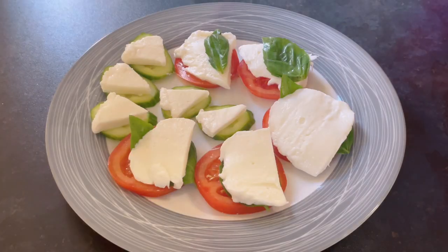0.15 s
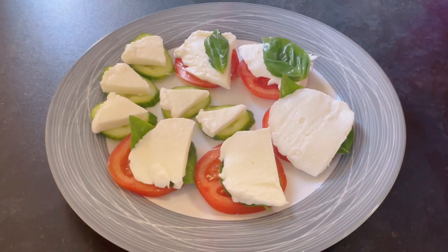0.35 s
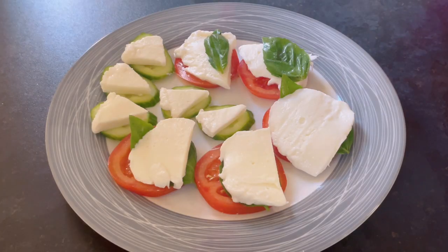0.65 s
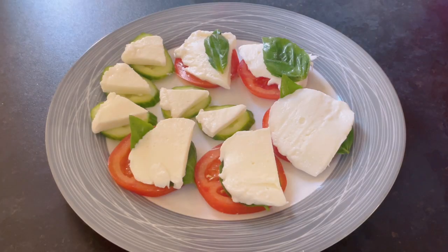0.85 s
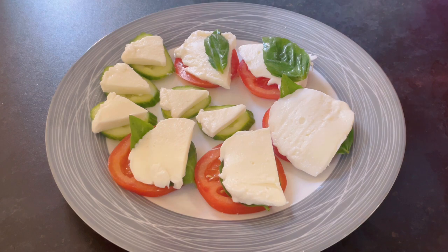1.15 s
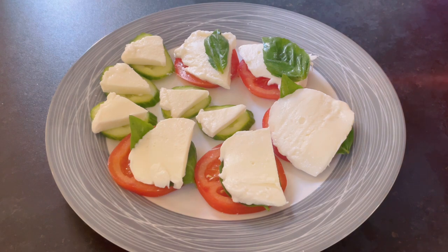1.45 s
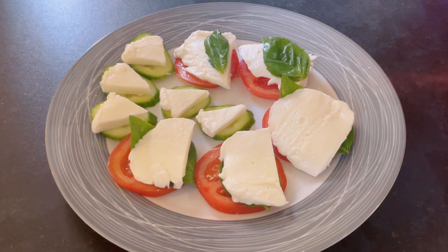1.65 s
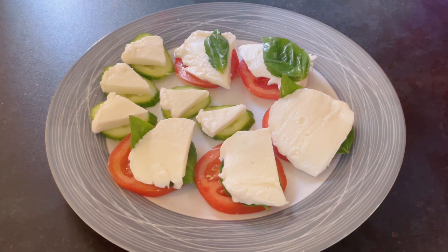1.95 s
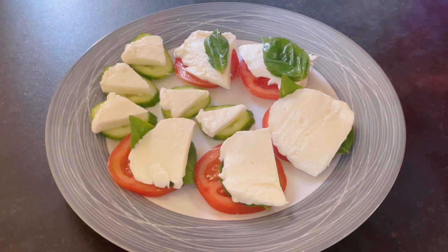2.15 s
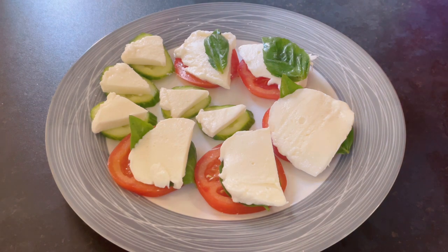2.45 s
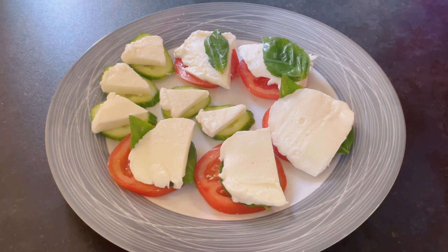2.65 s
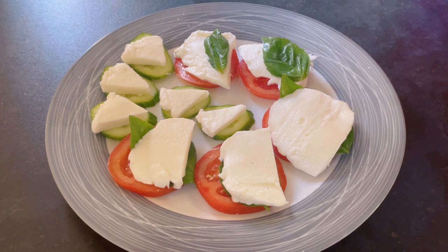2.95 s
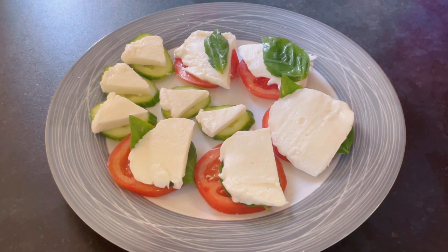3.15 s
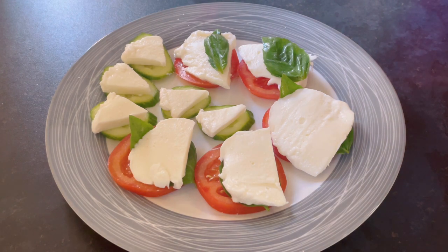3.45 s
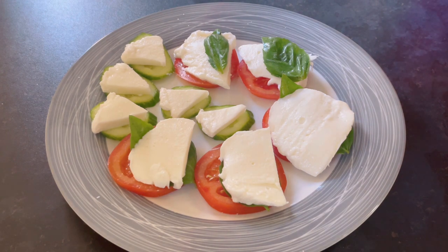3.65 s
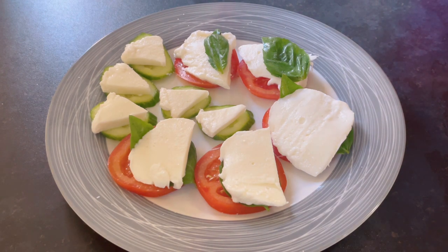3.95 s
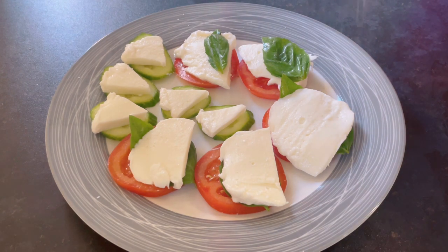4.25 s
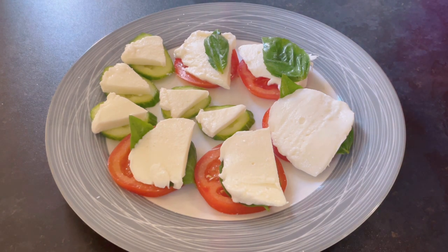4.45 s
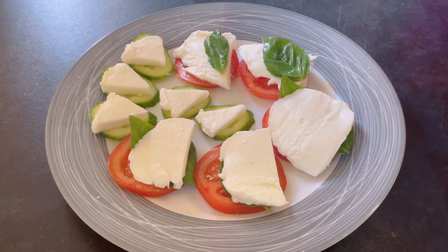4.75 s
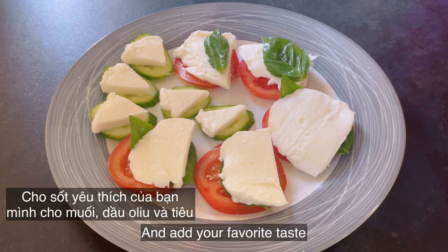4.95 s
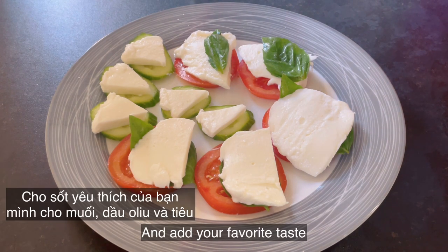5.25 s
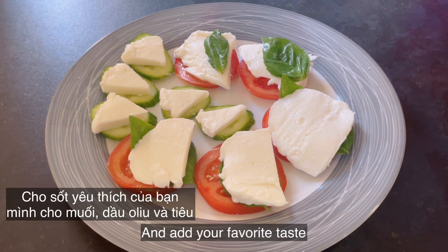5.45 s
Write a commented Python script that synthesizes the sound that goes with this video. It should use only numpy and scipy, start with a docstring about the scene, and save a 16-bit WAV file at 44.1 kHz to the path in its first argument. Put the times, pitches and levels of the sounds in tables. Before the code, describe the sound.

Close to the microphone in a small hard kitchen, a hand-turned spice mill grinds in short crunchy strokes from the very start. Sharp bright grain cracks ride over fine grit, with soft low thuds in the body. Between strokes loose grains patter, the mechanism ticks and a palm scuffs briefly. Strokes continue unevenly until the end, over faint rumble and hiss.

```python
"""In a small hard kitchen a hand-turned spice mill grinds in short strokes, close to one microphone.
From the start grains crack over finer grit, and the body thuds and is knocked. After the second stroke
loose grains settle, the mechanism ticks, a metal part rings faintly and the palm scuffs the body.
Strokes, ticks and scuffs then alternate to the end, over rumble and hiss. Noise bursts make the grains, shaped
noise the body and room, decaying sines the metal and the swing; a phase filter widens it to two channels."""
import sys
import numpy as np
from scipy import signal
from scipy.fft import rfft, irfft, next_fast_len
from scipy.io import wavfile
from scipy.ndimage import uniform_filter1d

SR = 44100
rng = np.random.default_rng(int(sys.argv[2]) if len(sys.argv) > 2 else 0)


def wav_out(sig):
    """Save sig, one row per channel (or a flat mono array), as 16-bit PCM at SR to the path in sys.argv[1]."""
    wavfile.write(sys.argv[1], SR, np.round(np.clip(np.atleast_2d(sig).T, -1, 1) * 32767).astype(np.int16))


def amplitude_ratio(level_db):
    """Convert a level in decibels to the matching linear amplitude (field) ratio."""
    exponent = np.asarray(level_db, float) / 20
    return 10 ** exponent


N = 246959


def rms_one(x):
    """Scaled to rms 1."""
    return x / np.sqrt(np.mean(x ** 2) + 1e-20)


def at_hz(points, hz):
    """A table read on a log-frequency axis."""
    hz_points, values = np.transpose(points)
    return np.interp(np.log(hz + 1), np.log(hz_points + 1), values)


def colour(x, spectrum):
    """Causal (minimum-phase) colouring with unit power gain on white noise."""
    size = 16384
    gain = rms_one(amplitude_ratio(at_hz(spectrum, np.fft.rfftfreq(size, 1 / SR))))
    cepstrum = irfft(np.log(gain))
    # folding the cepstrum forward in time gives minimum phase
    cepstrum[1:size // 2] *= 2
    cepstrum[size // 2 + 1:] = 0
    response = irfft(np.exp(rfft(cepstrum)))
    return signal.fftconvolve(x, response)[:len(x)]


def band(x, low_hz, high_hz):
    """Band-pass."""
    return signal.sosfilt(signal.butter(2, [low_hz, high_hz], "band", fs=SR, output="sos"), x)


def place(times, shapes):
    """Lays one short shape at each time."""
    out = np.zeros(N + shapes.shape[1])
    for s, shape in zip(times, shapes):
        at = max(round(s * SR), 0)
        out[at:at + len(shape)] += shape
    return out[:N]


def plateau(spans, in_db_per_s, out_db_per_s):
    """Level in dB over time: each span ramps in before its start, holds, and ramps out after its end."""
    start, end, level_db = np.transpose(spans)[:, :, None]
    t = np.arange(0, N, 32) / SR
    ramp_in = in_db_per_s * np.maximum(start - t, 0)
    ramp_out = out_db_per_s * np.maximum(t - end, 0)
    each = level_db - ramp_in - ramp_out
    return np.interp(np.arange(N) / SR, t, each.max(axis=0))


# Rumble of the grip and the room, over time: start_s, level_db
HANDLING = [(0, -66), (.39, -78.5), (1.09, -73), (1.249, -82), (1.85, -78.5), (1.999, -74.5), (3.15, -71.5),
            (3.37, -74), (4.16, -72), (5.41, -74), (5.6, -67)]
# Spectrum of that rumble, relative density: pitch_hz, level_db (per Hz)
RUMBLE = [(25, -22), (45, 2), (85, 0.5), (200, -5.5), (450, -7.5), (600, -18.5), (1000, -23.5), (3000, -58)]
# Spectrum of the room hiss, relative density: pitch_hz, level_db (per Hz)
AIR = [(300, -18.5), (1000, -15.5), (3000, -18), (7000, -4.5), (12000, -5.5), (14500, -6.5), (16000, -28)]
AIR_DB = -77.5  # rms level of the hiss


def air():
    """Low rumble that follows the grip, over a faint steady hiss."""
    # the first second is cut off, so that the colouring has settled
    rumble = rms_one(colour(rng.standard_normal(N + SR), RUMBLE)[SR:])
    hiss = rms_one(colour(rng.standard_normal(N + SR), AIR)[SR:])
    grip_db = np.interp(np.arange(N) / SR, *np.transpose(HANDLING))
    return amplitude_ratio(grip_db) * rumble + amplitude_ratio(AIR_DB) * hiss


# How long the small hard kitchen rings: pitch_hz, t60_s
KITCHEN_T60 = [(300, 0.78), (800, 0.26), (2100, 0.5), (5500, 0.39), (14000, 0.23)]


def kitchen(x, first_s=0.00081):
    """Dense reflections: noise dying band by band, after a short gap."""
    t, echo = np.arange(SR // 2) / SR, 0
    for hz in 125 * 2 ** np.arange(0, 7.1, .5):  # half-octave bands
        noise = band(rng.standard_normal(len(t)), hz / 2 ** .25, hz * 2 ** .25)
        echo = echo + noise * amplitude_ratio(-60 * t / at_hz(KITCHEN_T60, hz))
    echo = echo * np.clip(t / first_s - 1, 0, 1)
    unit_energy = echo / np.sqrt(np.sum(echo ** 2))
    return signal.fftconvolve(x, unit_energy)[:N]


# Palm sliding on the body: start_s, end_s, level_db, low_edge_hz, high_edge_hz
SCUFF = [(.69, 0.73, -75, 750, 960), (1.135, 1.168, -63, 247, 1014), (1.72, 1.748, -76.5, 764, 1110),
         (4.686, 4.738, -69, 657, 1030)]
SCUFF_IN_DB_PER_S, SCUFF_OUT_DB_PER_S = 1501, 304.5


def scuff():
    """Skin friction: a short dull hiss."""
    out = 0
    for start, end, level_db, low_hz, high_hz in SCUFF:
        slide_db = plateau([(start, end, level_db)], SCUFF_IN_DB_PER_S, SCUFF_OUT_DB_PER_S)
        out = out + amplitude_ratio(slide_db) * rms_one(band(rng.standard_normal(N), low_hz, high_hz))
    return out


# Hand knocks, the whole mill swings: start_s, level_db (before its soft rise)
SWINGS = [(1.161, -49.5), (3.005, -60), (4.1, -52.5), (4.206, -59.5), (4.556, -57), (5.552, -64)]
DEEP_HZ, DEEP_T60_S = 85, 0.21


def swings(rise_s=0.0043):
    """One deep decaying sine per hand knock: the whole mill swings."""
    s, level_db = np.transpose(SWINGS)[:, :, None]
    t = np.arange(16384) / SR
    swell = 1 - np.exp(-t / rise_s)
    swing = np.sin(2 * np.pi * DEEP_HZ * t) * swell * amplitude_ratio(level_db - 60 * t / DEEP_T60_S)
    return place(s[:, 0], swing)


# Jolts in the body as the burrs bite: start_s, level_db (before the soft rise)
THUDS = [(.157, -49.5), (.294, -48.5), (0.58, -61), (0.815, -62), (.952, -48.5), (1.162, -57), (1.442, -57),
         (1.746, -72), (2.047, -50.5), (2.523, -56.5), (2.675, -48), (3.004, -59.5), (3.183, -43.5),
         (3.603, -53), (3.68, -57), (3.76, -51.5), (4.1, -47), (4.205, -64), (4.556, -58), (5.1, -48.5),
         (5.382, -53), (5.552, -58)]
THUD_T60_S = 0.11


def thuds(rise_s=0.0046, edge_hz=320):
    """Soft low pushes: dull noise that swells and dies."""
    s, level_db = np.transpose(THUDS)[:, :, None]
    t = np.arange(16384) / SR
    dull = rms_one(band(rng.standard_normal((len(s), len(t))), 39.0, edge_hz))
    pushes = dull * (1 - np.exp(-t / rise_s)) * amplitude_ratio(level_db - 60 * t / THUD_T60_S)
    return place(s[:, 0], pushes)


# A hard grain giving way knocks the body: start_s, peak_db
KNOCKS = [(.2983, -42.5), (.9515, -53.5), (2.6825, -51.5), (3.1884, -43.5), (3.7655, -61), (4.1075, -53),
          (4.5529, -49), (5.1043, -45), (5.4926, -62), (5.557, -41)]
KNOCK_T60_S, KNOCK_LOW_HZ, KNOCK_HIGH_HZ = 0.02, 123, 820


def knocks():
    """Short hollow knocks: a noise burst in the body's low range."""
    s, peak_db = np.transpose(KNOCKS)[:, :, None]
    t = np.arange(4096) / SR
    dying = rng.standard_normal((len(s), len(t))) * amplitude_ratio(-60 * t / KNOCK_T60_S)
    burst = band(dying, KNOCK_LOW_HZ, KNOCK_HIGH_HZ)
    peak_one = burst / np.abs(burst).max(axis=1, keepdims=True)
    return place(s[:, 0], peak_one * amplitude_ratio(peak_db))


def strike(events, modes, soft_s, level_db):
    """Each touch rings every mode with a strength and a slight delay of its own, swelling in softly."""
    s, event_db = np.transpose(events)
    t, out = np.arange(1024) / SR, 0
    for hz, mode_db, t60 in modes:
        late, uneven = rng.random((len(s), 2)).T
        push = np.sin(2 * np.pi * hz * t) * np.exp(-t / soft_s) * 2 / (soft_s * SR)
        gain = amplitude_ratio(event_db + mode_db + level_db - 1.7 * uneven)
        force = place(s + soft_s * late, push * gain[:, None])
        # two-pole resonator: r is its decay per sample, w its pitch in radians per sample
        r, w = amplitude_ratio(-60 / (t60 * SR)), 2 * np.pi * hz / SR
        out = out + signal.lfilter([0, np.sin(w)], [1, -2 * r * np.cos(w), r * r], force + 1e-18)
    return out


# Play taken up on turning back: start_s, level_db
TICKS = [(0.6593, -41.5), (1.9046, -43), (2.9137, -39), (2.9393, -42.5), (4.91, -34.5)]
# What the mechanism adds to a tick: pitch_hz, level_db (over the tick, before the lift in metal), t60_s
TICK_MODES = [(6370, -20, .015), (13600, -22, 0.031)]
# Metal part brushed: start_s, level_db (before the mode level and the cut in metal)
RINGS = [(0.6905, -44), (1.7652, -50)]
# Modes of that part: pitch_hz, level_db (relative), t60_s
RING_MODES = [(2800, -3, .05), (3680, -5, .04), (4630, 0, .05), (5650, -3, .05), (8020, -2, .04),
              (9600, -6, .04), (10770, -4, 0.036), (12370, -1, .06), (14000, -3, .06)]


def metal():
    """Decaying resonances of the ticking mechanism and of the brushed metal part."""
    mechanism = strike(TICKS, TICK_MODES, soft_s=.0004, level_db=13.0)
    brushed = strike(RINGS, RING_MODES, soft_s=.005, level_db=-10.0)
    return mechanism + brushed


def ticks():
    """Rows for snaps: the dry tick of the mechanism on turning back."""
    low_db, high_db, ring_hz, ring_db = -9, -7, 6500, 4
    return [row + (low_db, high_db, ring_hz, ring_db) for row in TICKS]


def scattered(spans, per_s, over_db, spread_db, low_db, high_db, colour_db, ring_hz, ring_db):
    """Random failures inside the spans, as rows for snaps; ring_hz is a range."""
    rows = []
    for start, end, level_db in spans:
        even, normal = rng.random((40, 2)), rng.standard_normal((40, 3))
        s = start + np.cumsum(.2 + 2.4 * even[:, 0] ** 2) / per_s  # uneven gaps, per_s on average
        hz = ring_hz[0] * (ring_hz[1] / ring_hz[0]) ** even[:, 1]
        centre = [level_db + over_db, low_db, high_db]
        level, low, high = (centre + normal * [spread_db, colour_db, colour_db]).T
        drawn = zip(s, level, low, high, hz, np.full(40, ring_db))
        rows += [row for row in drawn if row[0] < end]
    return rows


# Loose grains settling as the mill tilts back: start_s, end_s, level_db
SETTLING = [(0.439, 0.647, -53), (1.17, 1.24, -50.5), (1.251, 1.311, -54)]


def settling():
    """Rows for snaps: a quick random patter of loose grains."""
    return scattered(SETTLING, per_s=170, over_db=0, spread_db=3, low_db=-25, high_db=-5,
                     colour_db=2.2, ring_hz=(4508, 3910), ring_db=16)


# Turns of the wrist: start_s, end_s, level_db (pressure on the burrs, as level of the fine grit)
STROKES = [(0, .07, -43), (.15, .36, -52), (.79, .84, -70), (.94, 1.09, -50), (1.43, 1.62, -52.5),
           (2.025, 2.14, -48.5), (2.48, 2.61, -58), (2.68, 2.72, -70), (3.08, 3.31, -52),
           (3.52, 3.62, -53.5), (3.66, 3.8, -60), (3.84, 4.02, -78), (4.06, 4.24, -59), (4.31, 4.46, -74),
           (4.55, 4.61, -55), (5.06, 5.22, -58), (5.38, 5.41, -47.5), (5.45, 5.6, -58)]
# What the mill radiates, relative density: pitch_hz, level_db (per Hz)
MILL = [(200, -33), (650, -34), (1100, -20), (1600, -19.5), (2400, -16), (3400, -16), (4200, -18),
        (5100, -9.5), (6500, -8), (8000, 0), (9400, 2), (11500, 4.5), (12600, 3), (14500, -6.5),
        (15800, -19.5), (16500, -41)]
BITE_DB_PER_S, EASE_DB_PER_S = 4000, 299.5  # pressure builds fast and eases off slower
SIFT_REL_DB = -12  # dust under the settling grains


def grit(per_s=2500, spread_db=3):
    """Dense small fractures of uneven size under the pressure of the stroke; dust sifts as grains settle."""
    broken = rng.random(N) < per_s / SR
    sizes = amplitude_ratio(spread_db * np.minimum(rng.exponential(1, N), 5)) * broken
    lasting = np.sqrt(signal.lfilter([1], [1, -.93], sizes ** 2))  # each dies over some samples
    sifting = [(start, end, level_db + SIFT_REL_DB) for start, end, level_db in SETTLING]
    pressure_db = plateau(STROKES + sifting, BITE_DB_PER_S, EASE_DB_PER_S)
    return amplitude_ratio(pressure_db) * rms_one(colour(lasting * rng.standard_normal(N), MILL))


def chips():
    """Rows for snaps: small grains chipping at random during a stroke."""
    return scattered(STROKES, per_s=70.0, over_db=14.5, spread_db=3.5, low_db=-20, high_db=-6,
                     colour_db=4, ring_hz=(2000, 14000), ring_db=9.5)


# Single grains cracking: start_s, level_db,
# low_db (part under 3 kHz, relative), high_db (part over 10 kHz, relative), pitch_hz (of the ring)
CRACKS = [(0.014, -24, -17, -5.5, 6260), (0.0365, -27, -25, -6, 6200), (0.0693, -22, -16.5, -1, 11200),
          (0.153, -16.5, -22.5, -5, 3420), (0.164, -18.5, -22, -1, 10000), (.1779, -17.5, -22, -2.5, 10200),
          (0.1886, -16, -24.5, -5.5, 6000), (0.2063, -26.5, -11.5, -18.5, 6000),
          (.2183, -27, -42, -12.5, 7000), (0.2395, -40, -10, -5.5, 9600), (0.255, -35.5, -14, -3.5, 6500),
          (.29, -30.5, -29.5, -14.5, 5740), (0.2992, -10.5, -19.5, -2, 9700), (0.3163, -31, -28, -29, 4930),
          (0.3292, -26, -12.5, -31, 3800), (0.3432, -23, -21, -2, 5800), (0.3543, -29, -13.5, -17, 4830),
          (.794, -23, -22, -6, 5920), (.798, -35, -15.5, -20, 5400), (0.8181, -24.5, -17, -4, 5600),
          (0.824, -28, -23, -12, 3190), (.832, -29.5, -20, -1.5, 7460), (0.9406, -17, -17.5, -1.5, 5700),
          (0.9508, -14.5, -22.5, -3, 6300), (0.9609, -16.5, -21, -11.5, 4900),
          (0.9757, -16, -18, -3.5, 9350), (1.0038, -26.5, -22, -26, 7300), (1.02, -28, -24, -4, 11670),
          (1.0381, -29.5, -16, -25.5, 9500), (1.056, -27, -24, -3, 12700), (1.061, -24.5, -24, -10, 9300),
          (1.0858, -43, -14, -18, 8530), (1.076, -33, -19, -9.5, 5840), (1.1596, -41, -19, 2, 10700),
          (1.2459, -48, -29.5, 1, 5080), (1.2542, -45.5, -12, -12.5, 4480), (1.431, -39, -22, -1, 11400),
          (1.4382, -29.5, -24.5, -18, 6460), (1.4426, -25.5, -19, -1.5, 13200),
          (1.448, -22, -16.5, -21, 6200), (1.456, -27.5, -16, 0, 9200), (1.4796, -35.5, -14, -8.5, 6240),
          (1.4997, -20, -27, -1.5, 9700), (1.55, -29.5, -14.5, -19, 3250), (1.554, -32, -20, -4, 12800),
          (1.6093, -21, -19.5, -2.5, 13000), (1.8594, -62.5, -7, -3.5, 12270), (1.976, -74, 12, -13, 1650),
          (2.0265, -21.5, -13, 2.5, 6300), (2.0385, -22.5, -20, -19, 8600),
          (2.0426, -29.5, -6, -11.5, 10100), (2.0543, -21, -13, -17, 8700), (2.066, -23, -14.5, -8, 6200),
          (2.0789, -20, -17, -2, 11400), (2.0936, -27, -13, -9.5, 5900), (2.0998, -42, -7, -16.5, 8600),
          (2.129, -21.5, -18, -3, 9700), (2.137, -22, -22.5, -2.5, 4000), (2.279, -52.5, -20.5, -5, 3030),
          (2.3428, -58, -13, -1, 4940), (2.4812, -32, -15, 2.5, 7776), (2.517, -23, -17.5, 0, 9360),
          (2.5235, -28, -12.5, -24, 8000), (2.5595, -24, -23.5, -10.5, 1610),
          (2.5662, -27.5, -15.5, -2.5, 13010), (2.6027, -35, -23, -4, 13090),
          (2.6826, -11.5, -20.5, -3, 5030), (2.7136, -22.5, -15, -1.5, 11600),
          (2.9913, -55, -12, -3.5, 4460), (3.0538, -48, -20, 0, 13800), (3.0937, -25.5, -19, -29, 7550),
          (3.097, -25, -14, -4, 13300), (3.1181, -24.5, -18, -0.5, 10770), (3.1384, -22, -16, -11.5, 3010),
          (3.166, -24, -12, -2, 12400), (3.1889, -15.5, -15.5, -2.5, 3470), (3.2088, -43, -20, 1, 2410),
          (3.2315, -26, -4.5, 4.5, 5750), (3.2911, -18, -23, -2, 1590), (3.3062, -42.5, -33, 10.5, 7000),
          (3.52, -58, -30, -11, 3020), (3.5405, -41, -10.5, 6, 5930), (3.5596, -36, -9, -15, 8650),
          (3.5839, -29.5, -10, -1, 10600), (3.601, -26.5, -21, -20, 1480), (3.6071, -32.5, -11, -3, 6000),
          (3.6215, -26, -24, -2.5, 13000), (3.6697, -24.5, -18, -4, 12950), (3.6875, -30, -9.5, -21, 3300),
          (3.6914, -25, -20, -2.5, 5800), (3.7295, -35, -24, -1, 10290), (3.737, -28, -14, -3.5, 9470),
          (3.7653, -21.5, -13, -3, 3580), (3.7876, -31.5, -13, -9.5, 9200), (3.7928, -30.5, -21, -13, 6040),
          (3.8526, -30.5, -26, -2.5, 10400), (3.883, -24.5, -27, -3.5, 10600),
          (3.918, -30.5, -23, -0.5, 11000), (3.943, -27, -49, -0.5, 6150), (3.9525, -28, -9.5, -7.5, 2160),
          (3.9934, -36.5, -23, -4.5, 13570), (4.018, -45.5, -23, -13, 7650),
          (4.0664, -23, -12.5, -5.5, 5040), (4.078, -26, -12, -25, 8200), (4.082, -20.5, -20, -1.5, 6250),
          (4.0955, -24, -12.5, -17.5, 3670), (4.1072, -21.5, -13.5, -3, 5300), (4.1922, -36, -13, 1, 10770),
          (4.211, -23, -16, -11, 4850), (4.2354, -45, -27, -9, 9700), (4.3369, -34.5, -28, -3.5, 9800),
          (4.3867, -37, -23, -4, 10800), (4.4152, -58, -15, 5, 8300), (4.445, -55, -11, 2, 2540),
          (4.4517, -47, -22, -10, 6300), (4.553, -23, -15, -11, 7630), (4.5641, -15, -21, -4.5, 5400),
          (4.5851, -30.5, -2.5, -4, 5300), (4.8058, -61.5, -7, 0.5, 6000), (4.862, -57, -17.5, 1, 4100),
          (4.8786, -65, -5, -10, 2670), (5.062, -50, -26, -8, 6800), (5.074, -41, -24, -1.5, 13100),
          (5.0875, -31, -19, -6, 10080), (5.1045, -17.5, -23, -1, 3600), (5.1311, -32.5, -9, 2, 1410),
          (5.1514, -28, -15.5, -3, 10770), (5.1703, -33, -13, -26, 9300), (5.1945, -26, -23.5, 0, 7800),
          (5.3253, -53.5, -19, -11, 1830), (5.34, -54, -21, -32, 6000), (5.3851, -24.5, -17.5, -10, 7150),
          (5.3979, -25, -25, 1, 6200), (5.405, -22.5, -11, -3.5, 7600), (5.4827, -35, -18, -1, 11300),
          (5.4929, -19, -19, -3, 7650), (5.5217, -27, -9.5, -13, 9500), (5.5319, -17.5, -16, -4, 8150),
          (5.557, -21, -17, -14.5, 7500)]
CRACK_RING_DB = 11  # ring over the broad burst, as it beams


def cracks():
    """Rows for snaps: single grains cracking between the burrs."""
    return [row + (CRACK_RING_DB,) for row in CRACKS]


def fractures(count, lead_s, rise_s=0.0006, hold_s=0.0021, fall_s=0.00081, crumble_db=-20,
              crumble_s=0.015, uneven_db=4.5):
    """Spectra of grain failures: a creak under load, a clump of micro-fractures a few ms long, crumbling."""
    t = np.arange(1536) / SR - lead_s
    draw = rng.standard_normal((count, 3, len(t)))
    length = np.exp(0.45 * draw[:, 2, :1])
    snap = np.minimum(1, np.exp(-(t - hold_s * length) / fall_s))
    crumbling = amplitude_ratio(crumble_db) * np.exp(-t / crumble_s)
    after = np.clip(1 - np.exp(-t / rise_s), 0, 1) * (snap + crumbling)
    creak = amplitude_ratio(-30.0 + 2.8 * draw[:, 2, 1:2]) * np.exp(-np.abs(t) / 0.003)
    lumps = uniform_filter1d(draw[:, 1], size=25, axis=1) * np.sqrt(25)  # fractures bunch up
    spectra = rfft(draw[:, 0] * (creak + after) * amplitude_ratio(uneven_db * lumps))
    # flattened over neighbouring bins: broadband
    return spectra / np.sqrt(uniform_filter1d(np.abs(spectra) ** 2, size=21, axis=1))


def snaps(events, width_hz=500, wall_share=0.15):
    """Each failure rings briefly at its own pitch and sounds through the mill in three parts."""
    s, level_db, low_db, high_db, ring_hz, ring_db = np.transpose(events)
    lead, hz = 256, np.fft.rfftfreq(1536, 1 / SR)
    spectra, heard = fractures(count=len(s), lead_s=lead / SR), []
    click = np.eye(1, 4096)[0]
    # the low part is flipped, so that it joins without a gap: level, edges in Hz, sign
    parts = [(low_db, 150, 3000, -1), (0, 3000, 10000, 1), (high_db, 10000, 19000, 1)]
    for share in (1, wall_share):  # the ring beams; the walls get little of it
        peak = (amplitude_ratio(share * ring_db) - 1)[:, None]
        ring = 1 + peak / (1 + 2j * (hz - ring_hz[:, None]) / width_hz)
        bursts, out = irfft(spectra * ring)[:, :-64], 0
        bursts /= np.sqrt(np.mean(bursts[:, lead:lead + 128] ** 2, axis=1, keepdims=True))
        for part_db, low_hz, high_hz, sign in parts:
            # each part at its own level, whatever the mill lets through
            passed = np.sqrt(np.sum(colour(band(click, low_hz, high_hz), MILL) ** 2))
            force = place(s - .0007 - lead / SR, bursts * amplitude_ratio(level_db + part_db)[:, None])
            out = out + sign * band(force, low_hz, high_hz) / passed
        heard.append(colour(out, MILL))
    return heard


def scene():
    """Channel one is what left and right share, channel two what differs between them."""
    body = grit() + thuds() + swings() + knocks() + scuff()
    ringing = metal()
    direct, spread = snaps(cracks() + ticks() + chips() + settling())
    to_walls = spread + body + amplitude_ratio(-0.5) * ringing
    shared = direct + body + ringing + amplitude_ratio(-10.0) * kitchen(to_walls) + air()
    apart = amplitude_ratio(-9.0) * kitchen(to_walls) + air()
    return np.array([shared, apart])


def band_limit(x):
    """A steep low-pass at the top of the band."""
    return signal.sosfilt(signal.butter(12, 16650, fs=SR, output="sos"), x)


# Phase curve of the stereo widening, left against right: pitch_hz, left_lead_rad
WIDENER_PHASE = [(60, .1), (900, .45), (1900, .05), (3550, .65), (4200, .4), (5050, .6), (5700, -1.4),
                 (6700, -.85), (7050, -1.1), (7500, -2.0), (8750, -3.2), (11200, -4.7), (13400, -6.25),
                 (16000, -6.3)]
# Level curve of the stereo widening: pitch_hz, left_minus_right_db
WIDENER_BALANCE = [(60, 0.5), (150, 1.0), (380, 0.5), (950, 2.0), (2380, 0.5), (5980, 0.0), (15000, 0.0)]
# Gain on the room sound that left and right do not share: pitch_hz, level_db
APART_GAIN = [(60, -11.5), (300, -11.5), (700, 0.5), (1300, -3), (2000, -36.5), (5400, -8), (7000, -35),
              (8800, -17.5), (15000, -27.5)]
CUTOFF_HZ = 19000  # 40 dB down from here up


def record(dry):
    """A stereo widener shifts phase and a little level between left and right; both ends of the range are cut."""
    size = next_fast_len(N + 4096)
    hz = np.fft.rfftfreq(size, 1 / SR)
    shared, apart = rfft(dry, size)
    apart = apart * amplitude_ratio(at_hz(APART_GAIN, hz))
    # half of each difference goes to either channel
    lean = amplitude_ratio(at_hz(WIDENER_BALANCE, hz) / 2) * np.exp(.5j * at_hz(WIDENER_PHASE, hz))
    stereo = irfft([(shared + apart) * lean, (shared - apart) / lean], size)[:, :N]
    stereo = signal.sosfilt(signal.butter(3, 45.0, "high", fs=SR, output="sos"), stereo)
    stereo = signal.sosfilt(signal.cheby2(8, 40, CUTOFF_HZ, fs=SR, output="sos"), stereo)
    return band_limit(stereo)


dry = scene()
out = record(dry)
wav_out(out)
```